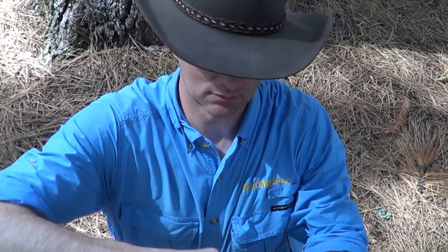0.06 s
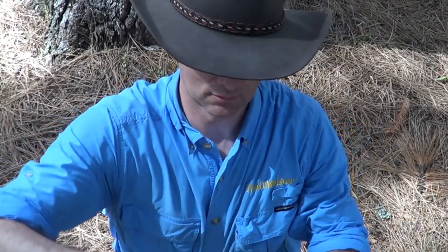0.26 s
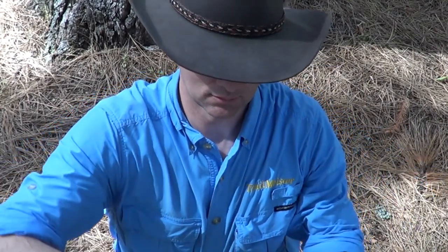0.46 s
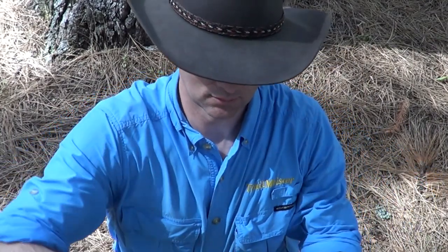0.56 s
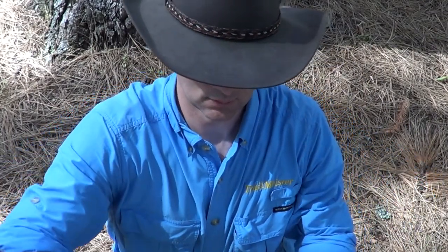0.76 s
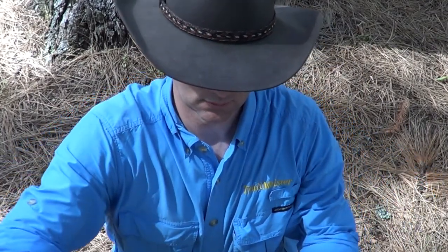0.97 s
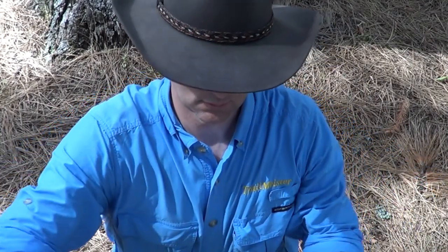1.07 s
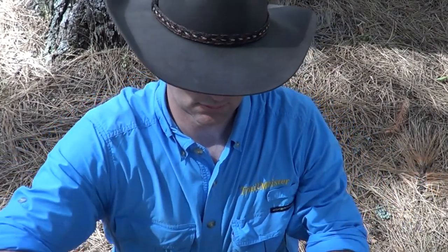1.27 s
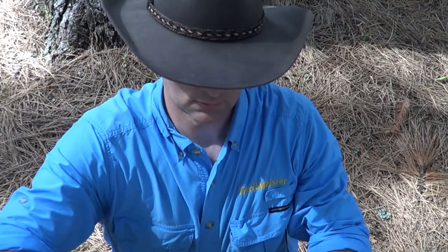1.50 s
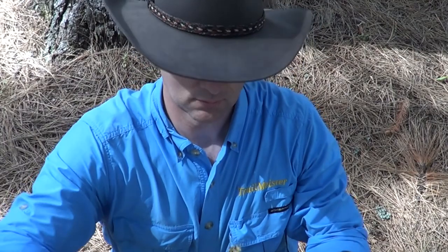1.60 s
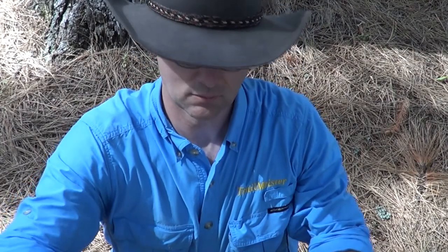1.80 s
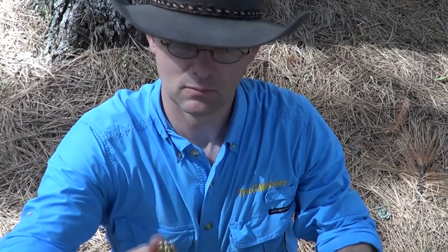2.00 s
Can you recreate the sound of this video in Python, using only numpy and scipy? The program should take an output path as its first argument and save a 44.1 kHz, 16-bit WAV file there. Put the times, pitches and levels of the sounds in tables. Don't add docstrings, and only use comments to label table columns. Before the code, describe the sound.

Brass ring and spring snap clink brightly about a metre away. Quick ticks and clinks come at 0.1-0.35 seconds, one at 0.48, a strong high ring at 0.62, then clusters at 0.83 and 0.97-1.06. Lighter clinks follow at 1.37-1.64, faint ticks near 1.95. Rope and sleeve rustle throughout; a faint bird falls at 0.3-0.7 over soft woodland air, insects and thin camera whine.

```python
import sys
import numpy as np
from scipy import signal
from scipy.fft import rfft, irfft
from scipy.io import wavfile
from scipy.ndimage import uniform_filter1d

SR = 44100
rng = np.random.default_rng(int(sys.argv[2]) if len(sys.argv) > 2 else 0)


def log_audio(samples):
    frames = np.atleast_2d(samples).T
    limited = np.clip(frames, -1, 1)
    pcm = np.round(limited * 32767).astype(np.int16)
    wavfile.write(sys.argv[1], SR, pcm)


def level_to_linear(level):
    exponent = np.asarray(level, float) / 20
    return 10 ** exponent


N = 90404


def level(x, db=0):
    return x * level_to_linear(db) / np.sqrt(np.mean(x ** 2))


def colour(x, points):
    hz, db = np.array(points, float).T
    f = np.fft.rfftfreq(N, 1 / SR) + 1
    return irfft(rfft(x) * level_to_linear(np.interp(np.log(f), np.log(hz), db)), N)


def smooth(x, width):
    return uniform_filter1d(uniform_filter1d(x, width), width)


def walk(rate):
    hold = int(SR / rate)
    steps = np.repeat(rng.standard_normal(N // hold + 1), hold)
    return 1.44 * smooth(steps, hold)[:N]


def add(out, s, x):
    i = int(s * SR)
    out[i:i + len(x)] += x[:N - i]


def fade(t, t60):
    return np.exp(-np.log(1000) * t / t60)


def warble(hz, width_hz):
    slow = smooth(rng.standard_normal((2, N)), max(int(SR / width_hz), 1))
    phase = 2 * np.pi * np.cumsum(hz) / SR
    return level(slow[0] * np.cos(phase) + slow[1] * np.sin(phase))


def wood_air():
    air_db = -54
    # (frequency [Hz], level [dB])
    air_points = [(15, -56), (30, -15), (60, -5), (354, -4.5), (936, -10), (1400, -15.5), (6740, -19),
                  (16000, -21)]
    # (frequency [Hz], side level [dB])
    side_points = [(30, -21), (125, -9), (700, 1), (6500, 0.5), (9000, -18.5)]
    mid, side = (colour(rng.standard_normal(N) * level_to_linear(0.17 * walk(6.4)), air_points) for _ in range(2))
    gain = level_to_linear(air_db) / np.std(mid)
    return gain * mid, gain * colour(side, side_points)


def far_bird(t):
    width_hz, upper_hz = 200, 260
    # (time [s], frequency [Hz], level [dB])
    call = [
        (0.269, 3915, -66),
        (0.329, 3930, -61.5),
        (0.42, 4087, -60),
        (.5, 3826, -66),
        (0.601, 3536, -72),
        (.67, 3470, -67.5),
        (.74, 3450, -67.5),
    ]
    s, pitch, db = np.array(call).T
    hz = np.interp(t, s, pitch)
    upper = 1.4 * warble(hz + upper_hz, width_hz) * level_to_linear(2.3 * walk(29.9))
    song = warble(hz, width_hz) + upper
    return song * level_to_linear(np.interp(t, s, db, left=-200, right=-200))


def crickets():
    cricket_hz, cricket_width_hz, cricket_db = 2535, 90, -74
    insect_hz, insect_width_hz, insect_db = 6500, 1000, -68.5
    cricket = warble(np.full(N, float(cricket_hz)), cricket_width_hz) * level_to_linear(cricket_db + 2 * walk(24.9))
    insect = warble(np.full(N, float(insect_hz)), insect_width_hz) * level_to_linear(insect_db)
    return cricket + insect


def rustle(t):
    fibres_per_s, spread_db, snaps_db, snap_s = 900, 6.5, -0.5, 0.00064
    # (time [s], level [dB])
    motion = [(0, -55), (.07, -54), (.095, -48), (.12, -58), (.19, -52), (.24, -50), (.26, -51.5),
              (.36, -54), (.42, -55.5), (.53, -51.5), (.68, -55.5), (.85, -59.5), (.9, -58), (1.06, -60),
              (1.15, -59.5), (1.37, -62), (1.42, -50), (1.53, -54.5), (1.6, -53), (1.72, -51.5),
              (1.84, -52), (1.9, -62), (2.05, -49)]
    # (frequency [Hz], level [dB])
    cloth_points = [(2000, -11), (7000, -8.5), (8500, 1.5), (10500, 2.5), (15500, -11.5)]
    strength = level_to_linear(spread_db * np.minimum(rng.exponential(size=N), 2))
    clicks = (rng.random(N) < fibres_per_s / SR) * strength
    bursts = signal.lfilter([1], [1, -np.exp(-1 / (snap_s * SR))], clicks) * rng.standard_normal(N)
    hiss = rng.standard_normal(N) * level_to_linear(2.2 * walk(30))
    s, db = np.array(motion).T
    return level(colour(level(bursts, snaps_db) + hiss, cloth_points)) * level_to_linear(np.interp(t, s, db))


def ticks():
    tick_db, width, rise = -3.5, 0.94, 0.046
    thud_s, thud_db, thud_hz = .2072, -36.5, 400
    # (time [s], peak level [dB], centre frequency [Hz], 60 dB fade [s])
    contacts = [(.1425, -23.5, 8460, 0.0029), (.195, -33, 11000, 0.015), (.2072, -25.5, 4750, 0.0061),
                (.2073, -21, 8000, 0.005), (.6203, -25.5, 6050, 0.01), (.2183, -26, 9500, .004),
                (.2845, -34, 10000, 0.011), (.298, -34, 10500, 0.016), (.2985, -38, 4300, 0.0092),
                (.116, -35, 7000, .004), (.166, -37, 9000, .006), (.2095, -18.5, 11800, 0.029),
                (.2235, -27, 10500, 0.0095), (.2235, -35, 3900, 0.016), (.269, -25, 9100, 0.0099),
                (.2692, -25, 4340, 0.011), (.304, -23.5, 10200, 0.066), (.325, -38, 9000, 0.011),
                (.352, -23.5, 9400, 0.0067), (.4815, -24, 6060, 0.0049), (.6203, -15.5, 9500, 0.011),
                (.622, -13, 10200, 0.026), (.8313, -21, 9000, 0.0049), (.838, -22, 10000, 0.025),
                (.9748, -21, 8500, 0.028), (.9775, -18, 9100, 0.014), (.9885, -23.5, 9050, 0.026),
                (1.0118, -15.5, 6500, 0.005), (1.0122, -14.5, 8500, 0.017), (1.052, -20.5, 8160, 0.0067),
                (1.0545, -20.5, 8550, 0.0063), (1.059, -35.5, 2880, 0.022), (1.0592, -38, 6000, 0.036),
                (1.3646, -36, 11500, 0.0027), (1.379, -21, 8500, 0.0068), (1.3795, -28.5, 2900, 0.0027),
                  (1.396, -34, 9500, 0.011), (1.444, -42, 2520, 0.0084), (1.4724, -30.5, 9500, 0.008),
                  (1.4506, -31, 8500, 0.0065), (1.55, -34, 10500, 0.013), (1.565, -40, 7000, .006),
                  (1.5704, -30, 9300, 0.0081), (1.5015, -31, 9500, 0.0077), (1.558, -38, 3050, 0.014),
                  (1.5738, -31.5, 9600, 0.0057), (1.6253, -41, 9000, 0.014), (1.642, -34.5, 10600, 0.033),
                  (1.9409, -36, 3980, 0.008), (1.9407, -36, 9800, .006), (1.961, -33.5, 8200, 0.015)]
    thud = [(thud_s, thud_db, thud_hz, .025), (thud_s, thud_db + 0.5, 4 * thud_hz, .012)]
    out, t = np.zeros(N), np.arange(4096) / SR
    f = np.fft.rfftfreq(len(t), 1 / SR)
    for s, db, hz, t60 in contacts + thud:
        width_hz = width * hz / (1 + t60 / 0.086)
        band = 1 / (1 + (2 * (f - hz) / width_hz) ** 4)
        band += level_to_linear(-22) * (f > hz / 5) * (f < hz)
        crack = level(irfft(rfft(rng.standard_normal(len(t))) * band), db + tick_db)
        onset = 1 - np.exp(-t / (rise * t60 ** 2 / 0.022))
        add(out, s, crack * fade(t, t60) * onset)
    return out


def snap():
    drift, rise_s = .002, 0.00012
    # (frequency [Hz], level [dB], 60 dB fade [s])
    snap_tones = [(2030, 2.5, 0.012), (3450, 4, 0.013), (4900, -1, 0.014), (8310, -4, 0.026),
                  (9200, 3, 0.033), (9650, 4.5, 0.034), (9900, -0.5, 0.026), (10370, 3.5, 0.021),
                  (11050, 4, 0.022), (11960, -2, 0.025), (12680, 0.5, 0.034), (13790, -4, 0.035),
                  (14430, 0, 0.02), (15040, 3, 0.022)]
    # (time [s], level [dB], favoured frequency [Hz], spread [Hz], freedom from the fingers [ratio])
    clinks = [(.143, -29, 4900, 298, .9), (0.1432, -37, 9900, 500, 0.83), (.144, -40, 12300, 400, .9),
              (.218, -33, 8310, 250, 2.2), (0.2231, -20.5, 10440, 400, 0.62),
              (.270, -25.5, 10350, 900, 0.66), (0.2695, -34, 13790, 400, 0.98),
              (.325, -40, 4900, 300, 0.87), (0.352, -20.5, 8310, 300, .6), (0.476, -39, 9350, 402, 0.79),
              (0.4817, -32, 11400, 700, 1.2), (0.482, -23, 9470, 620, 0.84), (.569, -46, 9990, 400, 1.1),
              (0.622, -32, 12400, 500, .7), (0.6515, -38, 9900, 200, .5), (.661, -36.5, 8310, 500, 0.99),
              (.662, -38, 9900, 300, .5), (0.8313, -28.5, 9700, 400, .9), (0.856, -40, 8760, 450, 1.4),
              (.839, -38, 13790, 300, .6), (0.978, -28.5, 9650, 300, 0.83), (.982, -29, 9650, 250, .8),
              (.981, -36, 14430, 400, 1.1), (1.012, -17, 12680, 250, .95), (1.012, -25.5, 15040, 298, .9),
              (1.044, -38, 11050, 200, 1.8), (1.044, -37, 9800, 250, .9), (1.0525, -24, 9800, 800, .6),
              (1.0539, -25, 11050, 250, 1.2), (1.396, -39, 8310, 300, .4), (1.443, -44, 11050, 250, 1.5),
              (1.4508, -30, 11050, 250, 1.3), (1.4508, -38, 9400, 400, .4), (1.472, -34, 4900, 300, 0.95),
              (1.502, -37, 9480, 500, 0.46), (1.558, -40, 12100, 400, 1)]
    # (time [s], level [dB], favoured frequency [Hz], spread [Hz],
    # freedom from the fingers [ratio])
    knocks = [
        (.6205, -38, 2030, 300, 0.85),
        (1.012, -46, 3450, 300, .9),
        (1.0125, -40, 4900, 300, 0.98),
        (1.0535, -38.5, 3450, 300, 0.55),
        (1.502, -44, 3450, 300, 0.93),
        (1.565, -45.5, 2030, 300, .6),
        (1.571, -49, 3450, 300, .7),
        (1.396, -44, 3450, 400, .6),
    ]
    out, t = np.zeros(N), np.arange(SR // 12) / SR
    hz, db, t60 = np.array(snap_tones).T[:, :, None]
    for s, hit_db, mid_hz, spread_hz, free in clinks + knocks:
        uneven, detune = rng.standard_normal((2, len(hz), 1))
        favour = 1 / (1 + ((hz - mid_hz) / spread_hz) ** 4) ** .5
        gain = level_to_linear(hit_db + db + 1.2 * uneven) * favour
        tones = gain * np.sin(2 * np.pi * hz * (1 + drift * detune) * t) * fade(t, t60 * free)
        add(out, s, tones.sum(axis=0) * (1 - np.exp(-t / rise_s)))
    return out


def ring():
    rise_s, drift = .0008, 0.00065
    rough, rough_hz = .16, 454
    tail_db, tail_stretch = [-36, -25, -22], 8
    # (frequency [Hz], partner frequency [Hz], partner level [dB], 60 dB fade [s])
    ring_pairs = [
        (11190, 11410, -5, 0.034),
        (5966, 6160, 1.5, 0.056),
        (2139, 2225, -7, 0.051),
    ]
    # (time [s], third pair level [dB], second pair level [dB], first pair level [dB],
    # freedom from the fingers [ratio])
    blows = [(.2095, -21, -57, -49, 0.94), (0.6202, -3.5, -24, -43, 1), (0.8316, -27.5, -29.5, -32, 0.81),
             (0.894, -58, -48.5, -65, 0.36), (0.9377, -47, -42.5, -46.5, 0.79),
             (0.9765, -30, -26, -36, 0.5), (.983, -26, -41, -46, 0.99), (1.0115, -19, -22, -35.5, 0.4),
             (1.0155, -19.5, -26.5, -37, 0.96), (1.3795, -19.5, -35.5, -49, 0.78),
             (1.4506, -45, -45, -63, 0.8), (.968, -52, -46, -43, 0.5), (.962, -53, -47, -55, 0.59),
             (1.5011, -35.5, -62, -65, 0.44)]
    # (third pair's partner level [dB],
    # detune of first pair [%], detune of second pair [%])
    grips = [(-4, 1, 0), (-8, 0, -.3), (8, .5, 0.34), (.1, .1, .5), (.1, .5, .5), (-5, 0, 1), (.1, 1, 0.42),
             (.1, 6, -1), (-1, 3.5, -0.64), (3, -0.5, 0.2), (.1, .1, .1), (.1, -1, 0.78), (.1, .1, .5),
             (13, .1, .1)]
    out, t = np.zeros(N), np.arange(SR // 4) / SR
    hold = int(SR / rough_hz)
    for (s, *dbs, free), (third_partner_db, first_detune, second_detune) in zip(blows, grips):
        partner_dbs = [third_partner_db, *(1.64 * rng.standard_normal(2))]
        detunes = [0, second_detune, first_detune]
        for k, (hz, partner_hz, pair_db, t60) in enumerate(ring_pairs):
            slow = smooth(rng.standard_normal((2, len(t))), hold) * np.sqrt(hold)
            shake = slow[0] + 1j * slow[1]
            body = fade(t, t60 * free) * (1 + rough * shake)
            tail = level_to_linear(tail_db[k]) * free ** 8 * shake * fade(t, t60 * tail_stretch * free ** 3)
            turn = 2j * np.pi * t * (1 + drift * rng.standard_normal() + detunes[k] / 100)
            pair = np.exp(turn * hz) - level_to_linear(pair_db + partner_dbs[k]) * np.exp(turn * partner_hz)
            sound = (pair * (body + tail)).imag
            add(out, s, level_to_linear(dbs[k]) * sound * (1 - np.exp(-t / rise_s)))
    return out


def tree_scatter(metal):
    trees_db, trees_t60 = -24, .1
    t = np.arange(SR // 5) / SR
    tails = rng.standard_normal((2, len(t))) * fade(t, trees_t60)
    return [signal.fftconvolve(metal, h / np.linalg.norm(h))[:N] * level_to_linear(trees_db) for h in tails]


def scene():
    ground_s, ground_db, near_side_db = .0035, -13.5, -24
    t = np.arange(N) / SR
    air_mid, air_side = wood_air()
    bird, insects = far_bird(t), crickets()
    metal = ticks() + snap() + ring()
    add(metal, ground_s, level_to_linear(ground_db) * metal.copy())
    trees_mid, trees_side = tree_scatter(metal)
    near = metal + rustle(t)
    mid = air_mid + bird + insects + near + trees_mid
    side = air_side + 0.13 * bird + .5 * insects + 0.52 * trees_side
    side += level_to_linear(near_side_db) * np.roll(near, 3)
    return np.array([mid + side, mid - side])


def top_cut(x):
    return signal.sosfilt(signal.butter(12, 16470, fs=SR, output="sos"), x)


def record(dry):
    whine_hz, whine_db, top_hz = 15734, -62.5, 15900
    duck_db, duck_hold_s = -13, 0.021
    whine = level_to_linear(whine_db) * np.sin(2 * np.pi * whine_hz * np.arange(N) / SR)
    hold = int(duck_hold_s * SR)
    power = uniform_filter1d(dry.mean(axis=0) ** 2, hold, origin=(hold - 1) // 2)
    recent = np.sqrt(power + 1e-12)
    x = (dry + whine) / (1 + (recent / level_to_linear(duck_db)) ** 2)
    x = signal.sosfilt(signal.ellip(8, .2, 60, top_hz, fs=SR, output="sos"), x)
    return top_cut(x)


dry = scene()
out = record(dry)
log_audio(out)
```